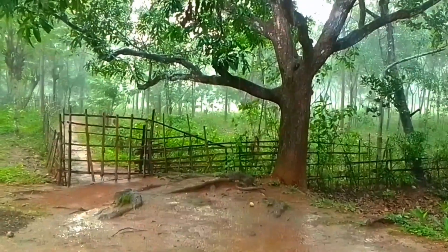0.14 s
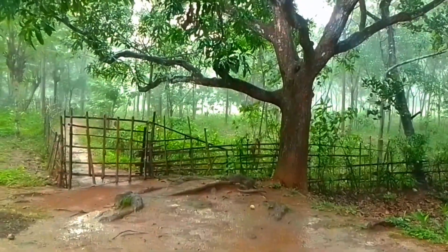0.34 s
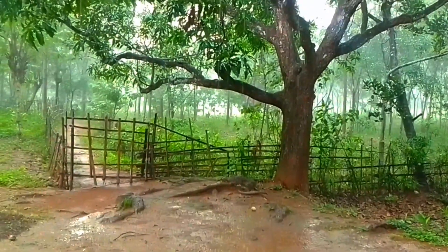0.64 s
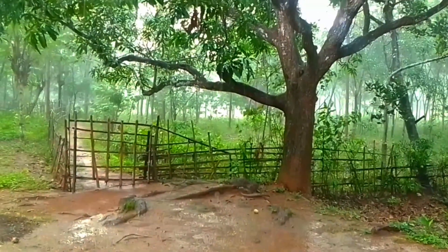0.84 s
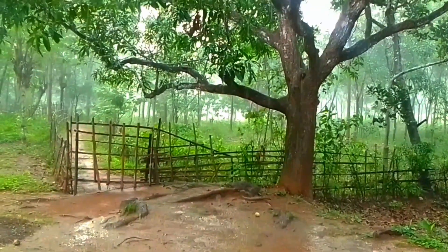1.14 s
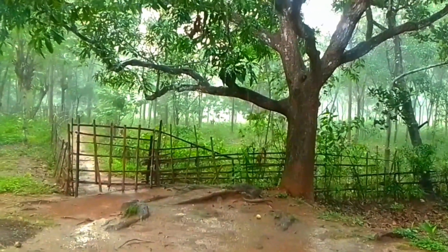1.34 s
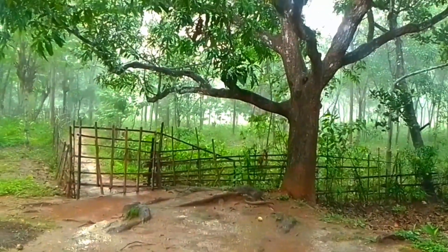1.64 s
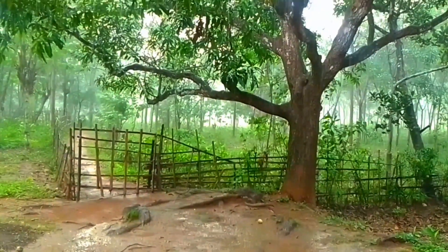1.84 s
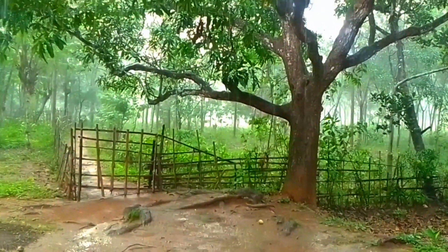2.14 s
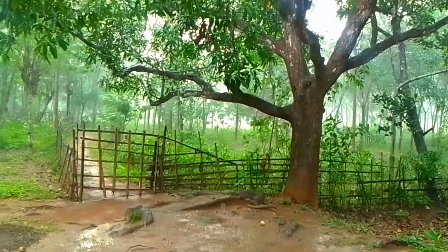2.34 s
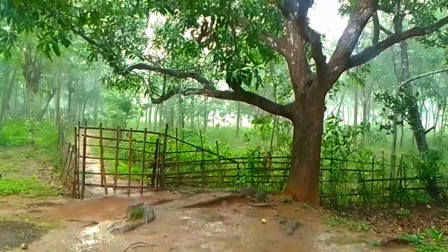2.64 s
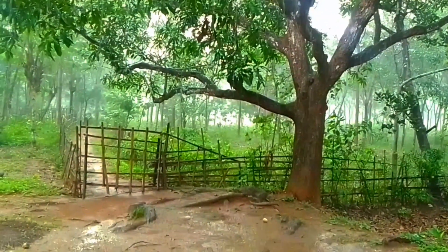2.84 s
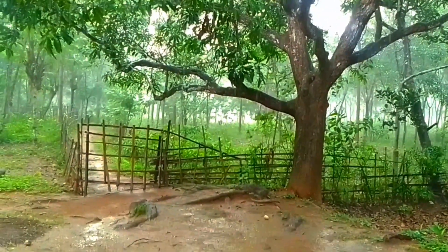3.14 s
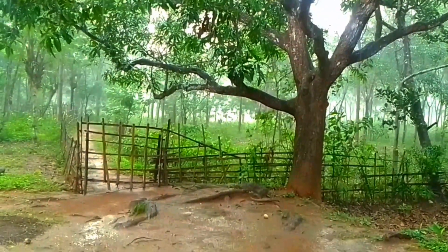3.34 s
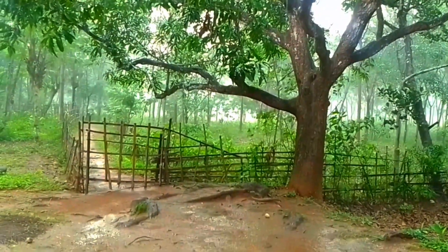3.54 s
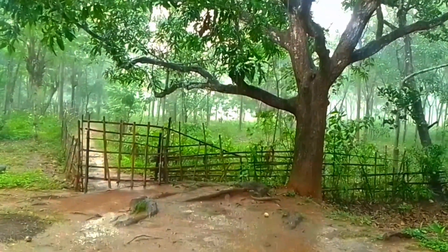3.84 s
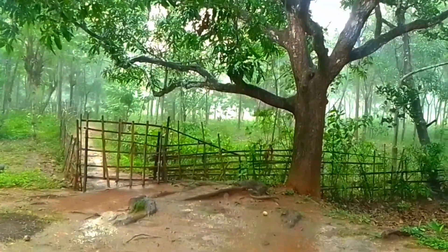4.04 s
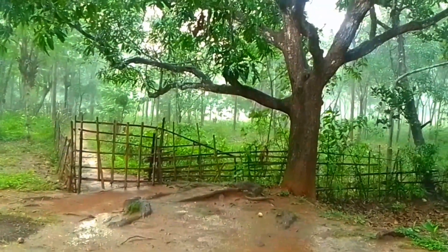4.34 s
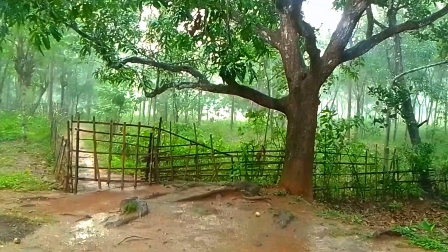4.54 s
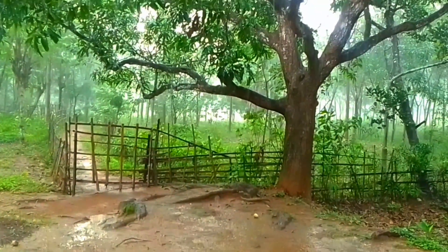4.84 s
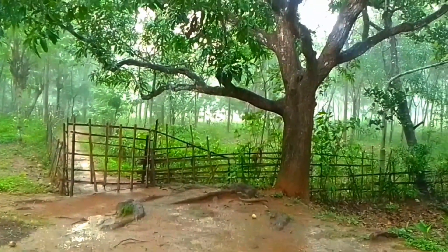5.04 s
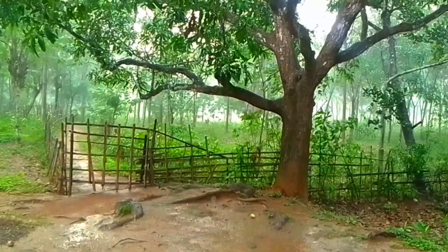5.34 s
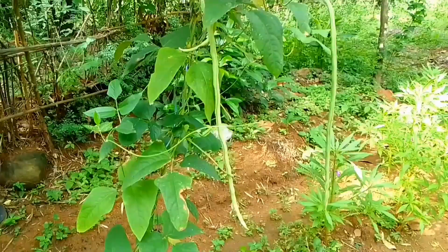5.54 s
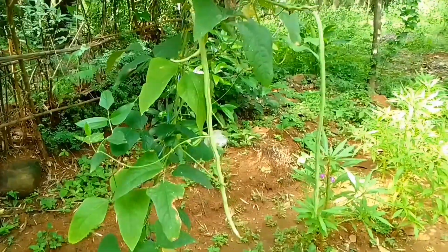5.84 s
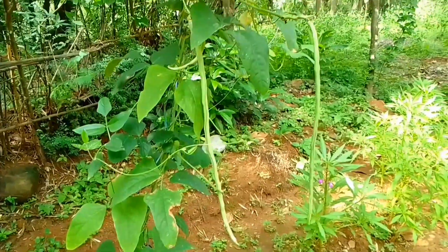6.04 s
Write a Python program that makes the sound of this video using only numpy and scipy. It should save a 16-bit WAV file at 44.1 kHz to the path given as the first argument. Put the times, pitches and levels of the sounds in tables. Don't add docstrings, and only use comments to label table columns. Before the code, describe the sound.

From 0 to about 5.6 s, heavy rain falls on foliage and wet ground: countless distant drops blend into a dense, mid-bright hiss that wavers only slightly. Close drops stand out above it, with small splashes, bright spatter and sharp ringing clicks on taut leaves, notably around 0.4, 1.5, 2.7, 3.6 and 4.9 s. Gusts make weak low thumps on the small microphone, mostly near 2.4 s, while its wind filter thins and restores the rain's bass. The sound is central, the same on both sides. At 5.58 s the rain cuts off instantly, leaving very quiet, thin garden air. A faint twig snap comes at 5.84 s with tiny after-ticks, alongside a barely audible high insect rasp, repeated briefly near 5.97 s. From 6.05 s a soft wind puff bumps the microphone and a far reedy horn fades in, fluttering, until everything stops at 6.21 s.

```python
import sys
import numpy as np
from scipy import signal
from scipy.fft import rfft, irfft, next_fast_len
from scipy.io import wavfile

SR = 44100
rng = np.random.default_rng(int(sys.argv[2]) if len(sys.argv) > 2 else 0)


def elevation(decibels):
    levels = np.asarray(decibels, float)
    return 10 ** (levels / 20)


def to_wav(sig):
    pcm = np.clip(np.atleast_2d(sig), -1, 1) * 32767
    pcm = np.round(pcm).astype(np.int16)
    wavfile.write(sys.argv[1], SR, pcm.T)


N = 273714
CUT_S, END_S = 5.5765, 6.2068

# t/s, level/dB
RAIN_LEVEL = [(0.0, -27), (0.2, -27.5), (0.73, -28.5), (1.1, -28.5), (1.4, -26.5), (1.84, -27.5),
              (2.11, -28.5), (2.28, -27), (2.43, -28.5), (2.78, -27.5), (3.3, -28.5), (4.08, -29.5),
              (4.17, -27), (4.5, -28), (4.81, -27), (4.95, -30), (5.3, -29.5), (5.57, -27)]
# f/Hz, level/dB per Hz
RAIN_SPECTRUM = [(70, -62), (120, -40), (188, -23.5), (245, -14.5), (377, -7.5), (700, -6.5), (1000, -6.5),
                 (1700, -5), (2300, -6), (3200, -12.5), (4940, -12.5), (7280, -21.5), (10500, -32),
                 (16000, -30)]
# t/s, level/dB
WIND_FILTER_OPENING = [(0.0, -42), (0.08, -54), (0.37, -46), (0.75, -52.5), (1.6, -45.5), (1.9, -51),
                       (2.1, -60), (2.6, -56), (2.9, -47.5), (3.18, -61.5), (3.28, -45), (3.99, -50.5),
                       (4.33, -45), (4.55, -48), (4.8, -41), (5.08, -51.5), (5.22, -46), (5.57, -49.5)]
# t/s, peak level/dB
SPLASH_EVENTS = [(0.1676, -30), (0.2259, -34.5), (0.3561, -25), (0.5382, -27), (0.638, -24), (1.1448, -23),
                 (1.4287, -24), (2.0782, -29), (2.2404, -28), (2.4294, -22.5), (2.7352, -20), (2.7976, -22),
                 (2.9248, -24), (2.9702, -26), (3.274, -26), (3.6087, -25), (4.3521, -29), (4.6628, -32),
                 (4.8804, -24), (5.0096, -30)]
# f/Hz, level/dB per Hz
SPLASH_SPECTRUM = [(600, -30), (1500, -14), (3000, 4), (6000, 7), (8400, -6.5), (11000, -11), (16000, -22)]
# t/s, peak level/dB
SPATTER_EVENTS = [(0.5243, -35), (0.6395, -35), (0.7557, -35), (1.1334, -32), (1.935, -28), (2.6853, -42),
                  (2.7357, -41), (2.9358, -33), (2.9712, -32), (3.6008, -37), (3.7459, -37), (3.9784, -35),
                  (4.2827, -38), (4.617, -40), (4.8809, -34), (5.024, -43)]
# f/Hz, level/dB per Hz
SPATTER_SPECTRUM = [(3000, -30), (7000, -12), (10000, -1), (13000, -2), (16000, -3)]
# t/s, peak level/dB, f/Hz
LEAF_CLICKS = [(.0564, -27, 8800), (.168, -24, 6500), (.357, -20, 5600), (.5404, -24, 6500),
               (.638, -24, 8800), (.8814, -23, 6600), (1.1344, -31, 12500), (1.4624, -23, 6600),
               (1.9994, -27, 8800), (2.6864, -28, 8500), (2.7365, -18, 4800), (2.7984, -23, 6000),
               (2.9364, -33, 12500), (2.9714, -26, 9200), (3.6018, -20, 8650), (3.6092, -21, 5700),
               (3.7194, -33, 12500), (3.7464, -25, 7000), (4.2474, -28, 8800), (4.3564, -26, 8800),
               (4.8834, -20, 8800)]
# f/Hz, level/dB per Hz
WIND_SPECTRUM = [(15, 0), (40, 0.5), (80, 3.5), (130, 0), (190, -3), (400, -47)]
# t/s, peak level/dB, f/Hz, half length/s
PORT_PUFFS = [(2.35, -42, 76, 0.0091), (2.395, -48, 60, .012), (2.457, -47, 80, .015),
              (2.48, -47, 125, .012), (2.482, -54, 28, .015), (2.535, -58, 55, .015),
              (4.75, -65, 111.4, .015), (4.96, -58, 90, 0.014), (6.074, -52, 141, .006),
              (6.091, -41, 100.4, 0.0073), (6.113, -53, 118.7, .014), (6.135, -55, 115.3, .012),
              (6.155, -56, 70, .016), (6.195, -56, 44.7, .02), (5.72, -62, 90, .01), (5.99, -61, 70, .015)]
# start t/s, attack/s, hold/s, release/s, rise/dB
GUST = (6.05, .04, .2, .1, 8.6)
# t/s, peak level/dB
TWIG_SNAPS = [
    (5.8425, -47),
    (5.862, -56),
    (5.887, -53),
    (5.92, -58),
    (6.182, -56),
]
# f/Hz, level/dB per Hz
TWIG_SPECTRUM = [(500, -28), (900, 0), (1340, -1), (2100, -9), (3500, -22), (7000, -45)]
# start t/s, hold/s, level/dB
INSECT_RASPS = [
    (5.85, .13, -90),
    (5.965, .04, -86),
]
# multiple of fundamental, level/dB, throb depth/0-1
HORN_PARTIAL_TABLE = [(2, -2.5, .2), (4, -6, .3), (5, -9, .3), (6, -7, .5), (8, -12, .5), (9, -1.5, .75),
                      (17, -20, .6)]
# f/Hz, level/dB per Hz
GARDEN_SPECTRUM = [(88, -31), (150, -12), (300, -0.5), (450, -5), (900, -6.5), (1500, -6.5), (2500, -7),
                   (4120, -15), (6500, -20.5), (9000, -30), (11000, -29), (15800, -36)]
# f/Hz, width/Hz, level/dB
PORT_RESONANCES = [(1316, 460, 7.5), (8610, 1650, 9.5)]


def rain():
    body_db, = in_time(RAIN_LEVEL)
    swing_db = body_db - body_db.mean()
    spray_db = (0.61 - 1) * swing_db
    bass_db = opening_db() - swing_db
    near = elevation(-7.0) * patter(900, 4.0, .004)
    near = near + elevation(-14.0) * patter(70, 3.0, .04)
    near = near + elevation(-10.0) * plinks(250, 25.0, 3.0)
    far = rng.standard_normal((2, N))
    gust_db = .5 * drift(7.2)
    edges_hz = 100 * 2 ** np.arange(0, 7.6, .5)
    out = 0
    for k, (low_hz, high_hz) in enumerate(zip(edges_hz, edges_hz[1:])):
        hz = np.sqrt(low_hz * high_hz)
        bright = np.clip(np.log2(hz / 1500) / 1.9, 0, 1)
        deep = np.clip(np.log2(420 / hz) / 0.52, 0, 1.2)
        drops = far[k % 2] + (0.069 + bright) * near
        band = bandpass(drops, low_hz, high_hz)
        patchy_db = 0.49 * drift(3.9)
        moves_db = bright * (spray_db + gust_db) + deep * bass_db + patchy_db
        out = out + elevation(moves_db) * rms_one(band) * np.sqrt(hz)
    return elevation(body_db + 1.24) * rms_one(coloured(out, RAIN_SPECTRUM))


def patter(per_s, spread_db, t60_s):
    sizes = elevation(spread_db * np.minimum(rng.exponential(1, N), 5)) * (rng.random(N) < per_s / SR)
    power = signal.lfilter([1], [1, -elevation(-120 / (t60_s * SR))], sizes ** 2 + 1e-18)
    return rms_one(np.sqrt(power) * rng.standard_normal(N))


def plinks(per_s, cycles, spread_db):
    sizes = elevation(spread_db * np.minimum(rng.exponential(1, N), 4)) * (rng.random(N) < per_s / SR)
    pitch_of_drop = rng.integers(0, 18, N)
    out = 0
    for k, hz in enumerate(np.geomspace(900, 14000, 18)):
        r, w = elevation(-60 * hz / cycles / SR), 2 * np.pi * hz / SR
        strikes = sizes * (pitch_of_drop == k) + 1e-18
        out = out + signal.lfilter([0, np.sin(w)], [1, -2 * r * np.cos(w), r * r], strikes)
    return rms_one(out)


def splashes():
    return elevation(-8.5) * bursts(SPLASH_EVENTS, SPLASH_SPECTRUM, 0.00082, 0.075)


def spatter():
    return elevation(-5.0) * bursts(SPATTER_EVENTS, SPATTER_SPECTRUM, .0008, .04)


def leaf_clicks():
    out, t = np.zeros(N), np.arange(256) / SR
    for s, peak_db, hz in LEAF_CLICKS:
        i = round(s * SR)
        level_db = peak_db + 2.0 - 60 * hz * t / 16.0
        out[i:i + len(t)] += elevation(level_db) * np.sin(2 * np.pi * hz * t)
    return out


def wind():
    t = np.arange(N) / SR
    *gust_times_s, gust_rise_db = GUST
    level_db = -74.5 - 0.7 * opening_db()
    level_db = level_db + gust_rise_db * swell(*gust_times_s) + 2.0 * drift(6.6)
    out = elevation(level_db + 3.5) * rms_one(coloured(rng.standard_normal(N), WIND_SPECTRUM))
    for s, peak_db, hz, half_s in PORT_PUFFS:
        envelope = elevation(peak_db) * np.exp(-((t - s) / half_s) ** 2)
        out = out - envelope * np.sin(2 * np.pi * (hz * t + rng.random()))
    return out


def twig_snaps():
    return elevation(-7.5) * bursts(TWIG_SNAPS, TWIG_SPECTRUM, .0008, 0.067)


def insect():
    centre_hz, half_width_hz, edge_s = 6500, 90, .015
    rasp = bandpass(rng.standard_normal(N), centre_hz - half_width_hz, centre_hz + half_width_hz)
    envelope = sum(elevation(db) * swell(s, edge_s, hold_s, edge_s) for s, hold_s, db in INSECT_RASPS)
    return envelope * rms_one(rasp)


def horn():
    fundamental_hz, throb_hz, throb_peak_s = 355.3, 29.5, 6.15
    t = np.arange(N) / SR
    beat = np.cos(2 * np.pi * throb_hz * (t - throb_peak_s))
    tones = 0
    for multiple, level_db, depth in HORN_PARTIAL_TABLE:
        level = elevation(level_db + 1.1 * drift(30)) * (1 + depth * beat)
        tones = tones + level * np.sin(2 * np.pi * (multiple * fundamental_hz * t + rng.random()))
    return elevation(-70.5) * swell(6.085, .05, 1, 1) * np.sqrt(2) * tones


def garden_air():
    air = rms_one(coloured(rng.standard_normal(N), GARDEN_SPECTRUM))
    return swell(CUT_S, 0.047, 1, 1) * elevation(-66.5 + 1.1 * drift(12)) * air


def opening_db():
    level_db, = in_time(WIND_FILTER_OPENING)
    return level_db - level_db.mean()


def bursts(rows, spectrum, rise_s, t60_s):
    t, envelope = np.arange(N) / SR, np.zeros(N)
    for s, peak_db in rows:
        i = round(s * SR)
        since_s = np.maximum(t[i:i + SR // 4] - s, 0)
        decay = elevation(peak_db - 60 * since_s / max(t60_s, .005))
        envelope[i:i + len(since_s)] += decay * (1 - np.exp(-since_s / rise_s))
    noise = rng.standard_normal(N)
    return coloured(envelope * noise, spectrum) / np.std(coloured(noise, spectrum))


def coloured(x, spectrum):
    size = next_fast_len(N)
    hz = np.maximum(np.arange(size // 2 + 1) * SR / size, 1)
    at_hz, level_db = np.transpose(spectrum)
    gain_db = np.interp(np.log(hz), np.log(at_hz), level_db)
    for centre_hz, width_hz, top_db in PORT_RESONANCES:
        gain_db = gain_db + top_db / (1 + (2 * (hz - centre_hz) / width_hz) ** 2)
    return irfft(rfft(x, size) * elevation(gain_db), size)[:N]


def bandpass(x, low_hz, high_hz):
    return signal.sosfilt(signal.butter(2, [low_hz, high_hz], "band", fs=SR, output="sos"), x)


def drift(rate_hz):
    r = np.exp(-80 * np.pi * rate_hz / SR)
    noise = rng.standard_normal(N // 40 + 2002)
    slow = signal.lfilter([1], [1, -2 * r, r * r], noise)[2000:]
    return np.interp(np.arange(N) / 40, np.arange(len(slow)), rms_one(slow))


def swell(start_s, attack_s, hold_s, release_s):
    since_s = np.arange(N) / SR - start_s
    falling = 1 + (attack_s + hold_s - since_s) / release_s
    return np.clip(np.minimum(since_s / attack_s, falling), 0, 1)


def in_time(rows):
    s, *columns = np.transpose(rows)
    return [np.interp(np.arange(N) / SR, s, c) for c in columns]


def rms_one(x):
    return x / np.sqrt(np.mean(x ** 2) + 1e-20)


def scene():
    t = np.arange(N) / SR
    after = np.clip((t - CUT_S) / .001 + 1, 0, 1)
    downpour = rain() + splashes() + spatter() + leaf_clicks()
    garden = garden_air() + twig_snaps() + insect() + horn()
    mono = (1 - after) * downpour + after * garden + wind()
    return np.tile(mono * (t < END_S), (2, 1))


def band_limit(x):
    return signal.sosfilt(signal.butter(12, 15500, fs=SR, output="sos"), x)


def record(dry):
    mix = dry - .0004
    return band_limit(mix)


dry = scene()
out = record(dry)
to_wav(out)
```